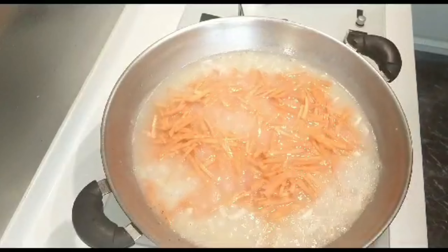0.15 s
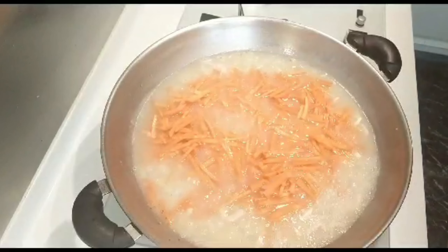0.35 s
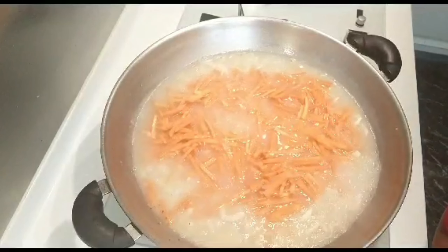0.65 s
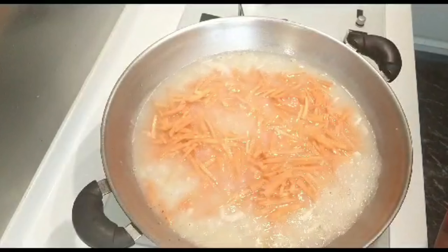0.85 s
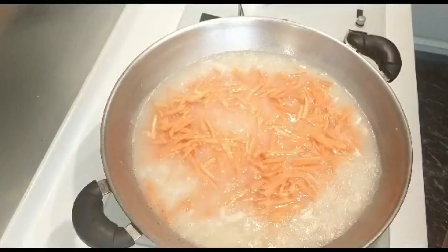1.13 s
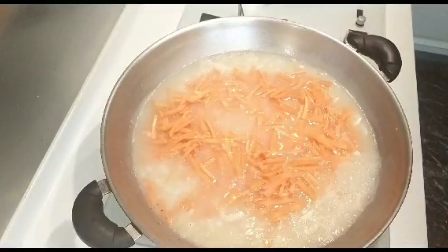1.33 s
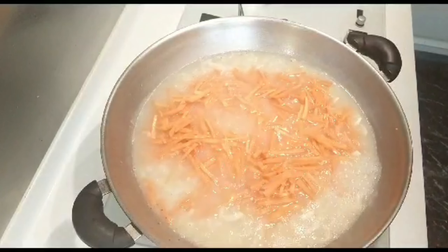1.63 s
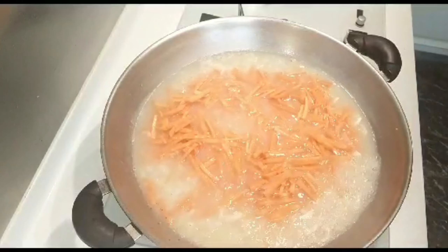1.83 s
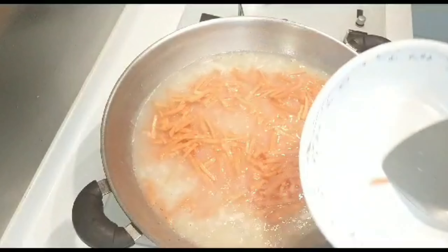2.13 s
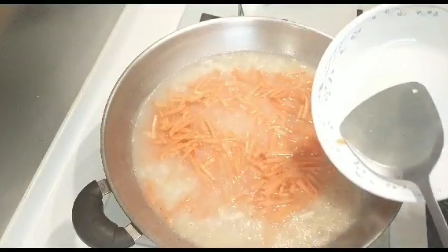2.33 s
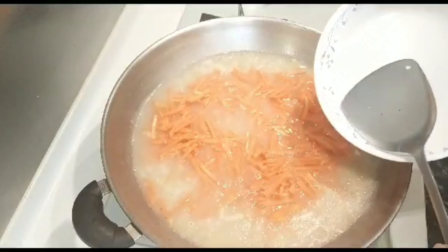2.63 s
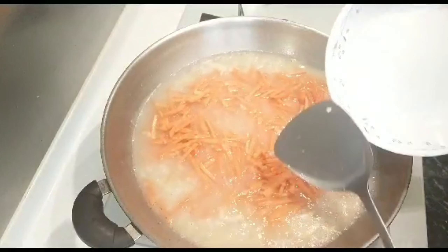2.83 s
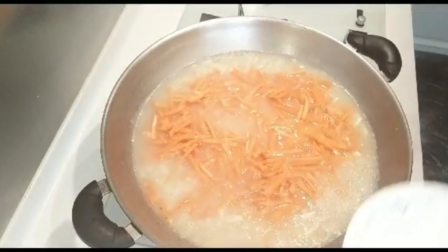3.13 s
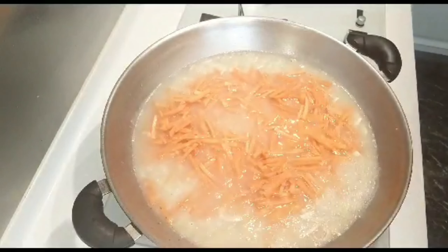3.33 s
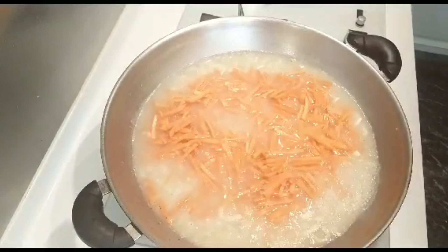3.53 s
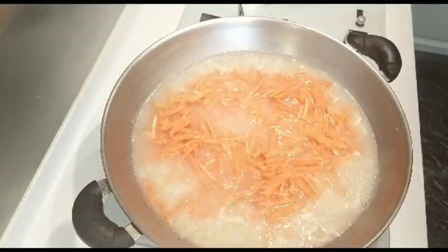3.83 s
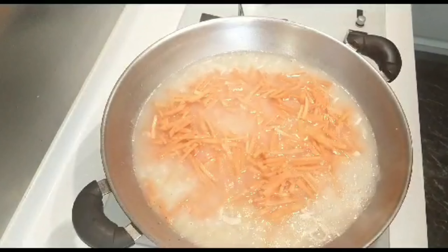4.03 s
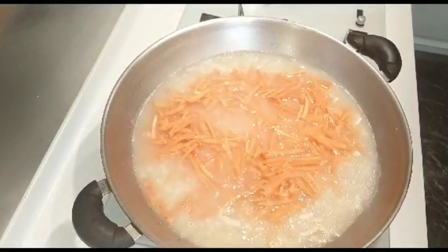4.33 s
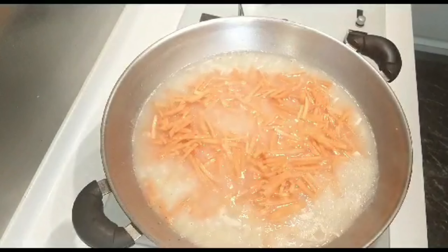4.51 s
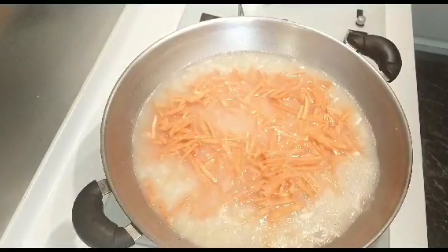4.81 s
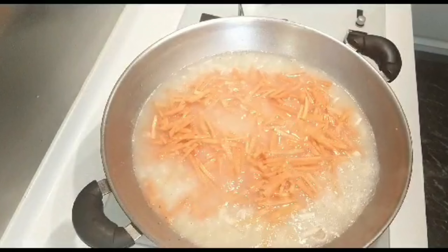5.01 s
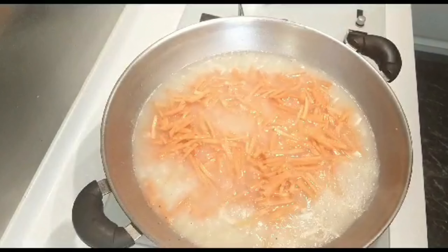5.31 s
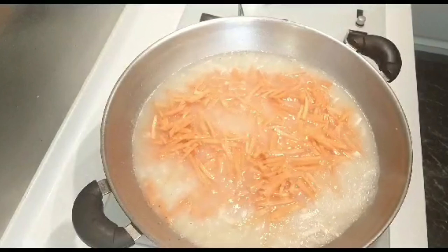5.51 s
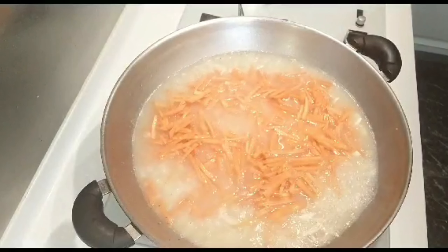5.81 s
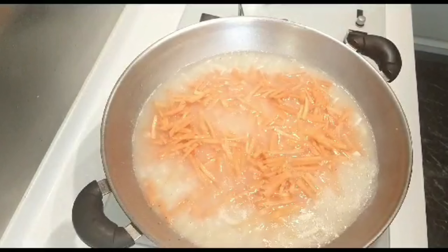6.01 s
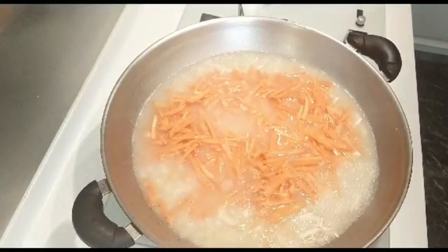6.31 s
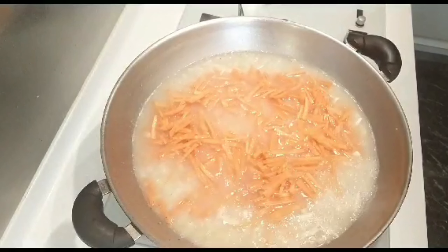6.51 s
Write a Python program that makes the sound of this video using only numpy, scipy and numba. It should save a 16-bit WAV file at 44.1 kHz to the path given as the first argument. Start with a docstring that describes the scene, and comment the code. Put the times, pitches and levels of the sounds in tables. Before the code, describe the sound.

A wide pan of broth boils with a low bubbling rumble and soft fizz while a metal utensil clinks, scrapes and is set down.

```python
"""Boiling broth and a metal utensil

Broth boils steadily in a wide steel pan in a small kitchen: swarms of dying sines make the rumble and the froth's fizz.
A utensil clinks, drags, taps, clinks again and is put down: ringing metal modes plus filtered clicks and knocks.
Two microphones a hand apart hear it with the room; their gain control ducks the boil after the loud clinks."""
import sys
import numpy as np
from scipy import signal
from scipy.fft import rfft, irfft, next_fast_len
from scipy.io import wavfile
from scipy.ndimage import uniform_filter1d
from numba import njit

SR = 44100
rng = np.random.default_rng(int(sys.argv[2]) if len(sys.argv) > 2 else 0)


def wav_out(sig):
    """Save sig, one row per channel (or a flat mono array), as 16-bit PCM at SR to the path in sys.argv[1]."""
    wavfile.write(sys.argv[1], SR, np.round(np.clip(np.atleast_2d(sig).T, -1, 1) * 32767).astype(np.int16))


N = 293706
TIME = np.arange(N) / SR
RING_TIME = TIME[:SR * 3 // 4]  # 0.75 s, for rings and room responses


def undb(db):
    """Decibels to gain."""
    return 10 ** (np.asarray(db) / 20)


def unit(x):
    """Scale to rms 1."""
    return x / np.sqrt(np.mean(x ** 2))


def burst(x):
    """Scale each channel to the energy of 20 ms at rms 1."""
    energy = np.sum(x ** 2, axis=-1, keepdims=True)
    return x / np.sqrt(energy / (SR / 50))


def add(out, s, sound):
    """Mix a sound in at a time in seconds."""
    start = int(s * SR)
    out[:, start:start + sound.shape[-1]] += sound[:, :N - start]


def shape(x, gain):
    """Filter by a gain that is a function of frequency."""
    size = next_fast_len(x.shape[-1] + 4096)
    hz = np.maximum(np.arange(size // 2 + 1) * SR / size, 1)
    return irfft(rfft(x, size) * gain(hz), size)[..., :x.shape[-1]]


def colour(points, hz):
    """Gain of a (Hz, dB) spectrum, interpolated over log frequency."""
    at, db = np.transpose(points)
    return undb(np.interp(np.log(hz), np.log(at), db))


def resonance_db(hz, centre_hz, width_hz, lift_db):
    """Bell-shaped lift, or dip, of one resonance."""
    return lift_db / (1 + (2 * (hz - centre_hz) / width_hz) ** 2)


def passband(x, lo_hz, hi_hz, order=1):
    """Causal band-pass."""
    edges = [lo_hz, min(hi_hz, SR / 2 - 100)]
    return signal.sosfilt(signal.butter(order, edges, "band", fs=SR, output="sos"), x)


MIC_GAP_M = 0.1


def diffuse(pair):
    """Sound from all sides at two spaced microphones: alike in the bass, unrelated in the treble."""
    def likeness(hz):
        return .995 * np.sinc(2 * hz * MIC_GAP_M / 343)  # 343 m/s, speed of sound
    mid = shape(pair[0] + pair[1], lambda hz: np.sqrt(1 + likeness(hz)))
    side = shape(pair[0] - pair[1], lambda hz: np.sqrt(1 - likeness(hz)))
    return np.array([mid + side, mid - side]) / 2


PAN_T60_S, NEAR_T60_S, ROOM_T60_S = 0.039, 0.15, 0.37
PAN_ECHO_DB, ROOM_DB = -2, -9.5  # against the near reflections


def kitchen():
    """Room response: first echoes inside the pan, a flurry from stove and worktop, then the duller walls."""
    first, near, far = (diffuse(rng.standard_normal((2, len(RING_TIME)))) for _ in range(3))
    fade_db = -60 * RING_TIME  # divided by a t60, falls 60 dB in that time
    first = burst(first * undb(fade_db / PAN_T60_S))
    near = burst(near * undb(fade_db / NEAR_T60_S))
    far = burst(passband(far, 60, 7600) * undb(fade_db / ROOM_T60_S))
    return undb(PAN_ECHO_DB) * first + near + undb(ROOM_DB) * far


def through(x, response):
    """Convolve with a stereo response."""
    x = np.atleast_2d(x)
    return signal.fftconvolve(x, response, axes=-1)[:, :x.shape[-1]]


@njit
def ring_bubbles(starts, hz, cycles, size, glide):
    """Each bubble is a dying sine whose pitch rises as it nears the surface."""
    out = np.zeros(N)
    for k in range(len(starts)):
        length = int(cycles[k] * SR / hz[k]) + 2
        pole = np.exp(2j * np.pi * hz[k] / SR - 5.8 / length)
        bend = np.exp(2j * np.pi * hz[k] / SR * glide / length)
        z = size[k] + 0j
        for i in range(starts[k], min(N, starts[k] + length)):
            z *= pole
            pole *= bend
            out[i] += z.imag
    return out


def swarm(rate, lo_hz, hi_hz, cycles, scatter_db, glide):
    """Bubbles of all sizes, most faint and a few strong, with even power per Hz."""
    when, pitch, life, strength = rng.random((int(rate * N / SR), 4)).T
    hz = lo_hz + (hi_hz - lo_hz) * pitch
    rarity = -np.log(1 - strength)
    strength_db = scatter_db * rarity / (1 + rarity / 10)  # the strongest are held back
    size = np.sqrt(hz) * undb(strength_db)  # higher bubbles are shorter, so start larger
    size = size * rng.choice([-1., 1.], len(hz))
    return ring_bubbles((when * N).astype(np.int64), hz, cycles * (.5 + life), size, glide)


# Spectrum of the big bubbles. Each row: frequency in Hz, relative level in dB per Hz.
BOIL_SPECTRUM = [(15, -61.5), (25, -31), (38, -26), (65, -12), (129, -2.5), (190, -9), (248, -8), (323, 0),
                 (366, -8), (429, -4.5), (559, -10), (768, -14), (1280, -18), (1400, -28.5), (1700, -34),
                 (2210, -56.5), (3740, -120)]
# Resonances of the filled pan on the stove. Each row: frequency in Hz, width in Hz, lift in dB.
PAN_RESONANCES = [(83.5, 42, 6), (103, 11, -7.5), (143.6, 38, 6), (252, 18, -2.5), (292, 12, 2),
                  (338.6, 11, 4.5), (379, 9.2, -9), (450.4, 27, 2), (570, 33, 6), (770, 32, -5.5),
                  (1159, 24, 5.5), (1327, 120, 7.5)]
BOIL_DB = -37


def boil():
    """Steam bubbles swell and collapse on the pan's floor, coloured by its resonances."""
    pair = np.array([swarm(rate=3200, lo_hz=30.4, hi_hz=1794, cycles=18.1, scatter_db=2.0, glide=0.16)
                     for _ in range(2)])

    def body(hz):
        lift_db = sum(resonance_db(hz, *row) for row in PAN_RESONANCES)
        return colour(BOIL_SPECTRUM, hz) * undb(lift_db)
    balance_db = np.array([[.35], [-.35]])  # left, right
    return unit(shape(diffuse(pair), body)) * undb(BOIL_DB + balance_db)


def surge(rate, depth_db):
    """Gain that wanders as patches of the surface well up and settle."""
    knots = np.arange(0, TIME[-1] + 1, 1 / rate)
    return undb(depth_db * np.interp(TIME, knots, rng.standard_normal(len(knots))))


# Spectrum of the froth. Each row: frequency in Hz, relative level in dB per Hz.
FROTH_SPECTRUM = [(880, -31), (1500, -1), (2300, -5.5), (3250, -6), (4370, -8), (4970, -9.5), (5330, -11),
                  (8240, -21.5), (9100, -17), (10600, -16.5), (14500, -34), (15400, -31.5), (16000, -48)]
FROTH_DB = -50.5  # before the surge


def froth(room, rim_hz=4270, rim_width_hz=150, rim_db=4):
    """Tiny bubbles burst at the surface and ring the pan's wall; the room blurs them into a fizz."""
    pair = np.array([swarm(rate=6000, lo_hz=1316, hi_hz=16000, cycles=11, scatter_db=0.5, glide=.07)
                     for _ in range(2)])
    wet = unit(through(pair[0], room)) + unit(through(pair[1], kitchen()))
    fizz = unit(wet) + undb(3.5) * unit(diffuse(pair))

    def body(hz):
        return colour(FROTH_SPECTRUM, hz) * undb(resonance_db(hz, rim_hz, rim_width_hz, rim_db))
    return unit(shape(fizz, body)) * undb(FROTH_DB) * surge(rate=14, depth_db=0.83)


MIC_LAG_S = .0001  # the utensil is a little nearer the right microphone


def with_direct(room, direct_db):
    """Put the straight path from the utensil to each microphone before the reflections."""
    straight = np.sinc((RING_TIME - np.array([[MIC_LAG_S], [0]])) * SR)
    return room + undb(direct_db) * burst(straight)


def mode(hz, t60, split=0.0041, twin_db=-2):
    """A mode of a round body: a close pair of partials that beat."""
    lower = np.cos(2 * np.pi * hz * (1 - split) * RING_TIME)
    upper = undb(twin_db) * np.cos(2 * np.pi * hz * (1 + split) * RING_TIME)
    onset = 1 - np.exp(-RING_TIME * hz)
    return (lower + upper) * np.exp(-np.log(1000) * RING_TIME / t60) * onset


# Modes of utensil and cookware in contact. Each row: frequency in Hz, t60 in seconds,
# then relative level in dB when met by the tip, by the edge, by the flat, and when dragged.
METAL_MODES = [(717, 0.4, -31, -10, -19, -34.5), (798, 0.12, -32, -6, -23, -35.5),
               (1170, 0.087, -33, -27, -16, -25.5), (1289, 0.16, 0, -16.5, -1.5, -20.5),
               (1258, 0.099, -10, -8, 6.5, -14), (1340, 0.16, -2.5, -9, -29, -11.5),
               (1910, 0.072, -22, -5, -3.5, -31), (2360, 0.13, -3.5, -3.5, -4.5, -3),
               (2380, 0.076, -12.5, -8.5, -8.5, -11), (2670, .09, -1.5, -3, -38, -22),
               (3180, 0.37, -15, -0.5, -47, -22), (3490, .06, -13, -17.5, -32, 1),
               (3950, .14, -16.5, -5.5, -9.5, -4), (4060, 0.13, -22, 2, -38, -14.5),
               (4980, 0.03, -6.5, -2.5, -21.5, -3), (5400, .14, -14.5, -2, -39, -13.5),
               (5550, 0.13, -2.5, -9, -28, -16.5), (5970, .1, -16.5, -12, -17.5, -12),
               (6160, .14, -22.5, -17.5, -16.5, -13.5), (6800, .14, -21.5, -5, -41.5, -18.5),
               (6800, 0.054, -5.5, -6.5, -42, -12), (6880, 0.35, -20, -4.5, -32, -13.5),
               (8380, 0.061, -11.5, -0.5, -23, -20), (9320, 0.1, -10.5, -9.5, -14.5, -6),
               (9530, .11, -13, 1.5, -28.5, -6), (9470, .12, -12.5, -5, -40, -5),
               (10090, 0.08, -7, 3, -31, -8), (10200, .08, -18.5, -14, -40.5, -4),
               (11210, .15, -12.5, -5, -18.5, -11), (12200, .08, -13, -7, -44, -9.5),
               (12800, .12, -15, -21.5, -25.5, -13), (12240, .08, -15, -3.5, -44.5, -11),
               (14320, .06, -39, -13, -40.5, -24), (15080, .1, -19.5, -32, -31, -16.5)]
PARTS = ("tip", "edge", "flat", "drag")
SPOT_DB = 2.44  # how much the mix of modes differs from spot to spot


def metal(room):
    """The ring of each mode, heard directly and in the room."""
    path = with_direct(room, direct_db=-2.0)
    return np.array([burst(through(mode(hz, t60), path)) for hz, t60, *_ in METAL_MODES])


def ring(modes, part, scatter_db):
    """Mix the modes for one contact; no two contacts fall on quite the same spot."""
    db = np.array(METAL_MODES)[:, 2 + PARTS.index(part)]
    db = db + scatter_db * rng.standard_normal(len(METAL_MODES))
    return burst(np.tensordot(undb(db), modes, 1))


def contact(knock_hz, knock_db, click_db, low_hz, top_hz, direct_db):
    """A click and a quickly damped knock; every spot has its own reflections."""
    room = with_direct(kitchen(), direct_db)
    narrow = passband(room, knock_hz / 1.054, knock_hz * 1.052)
    knock = burst(passband(narrow, knock_hz / 2, knock_hz * 2))
    click = burst(passband(room, low_hz, top_hz, order=2))
    return undb(knock_db) * knock + undb(click_db) * click


# Blows on the cookware. Each row: start in seconds, part that strikes, ring level in dB,
# seconds until it falls back.
BLOWS = [(2.1736, "tip", -18.5, .03), (2.7627, "edge", -13, .05), (3.7383, "flat", -5.2, 0.03)]
# Contact noise by striking part. Each entry: knock in Hz, knock level and click level in dB
# against the ring, lower and upper edge of the click in Hz.
CONTACT_NOISE = {"tip": (5197, -11, -10, 1800, 12499), "edge": (780, -12, -6, 450.5, 10000),
                 "flat": (1800, -15, -16, 220, 2000)}
# it rebounds and falls back more softly; each landing chatters once
CHATTER_S, CHATTER_DB, FALL_BACK_DB = .0145, -4.5, -12
REST_DAMP_DB_PER_S = 55  # extra damping once the utensil rests on the cookware


def clinks(modes):
    """Each blow lands, falls back and chatters; resting on the cookware then damps the ring."""
    out = np.zeros((2, N))
    for s, part, db, fall_s in BLOWS:
        for land_s, land_db in ((0, db), (fall_s, db + FALL_BACK_DB)):
            for late_s, loss_db in ((0, 0), (CHATTER_S, CHATTER_DB)):
                rested_s = np.maximum(land_s + late_s + RING_TIME - fall_s - CHATTER_S, 0)
                rings = ring(modes, part, SPOT_DB) * undb(-REST_DAMP_DB_PER_S * rested_s)
                noise = contact(*CONTACT_NOISE[part], direct_db=-11)
                add(out, s + land_s + late_s, undb(land_db + loss_db) * (rings + noise))
    return out


# the utensil slides: pressed harder up to the firmest moment, then eased until it lifts off
DRAG_START_S, DRAG_FIRM_S, DRAG_END_S = 2.2, 2.3, 2.43
SLIP_DB, PRESS_DB_PER_S, EASE_DB_PER_S = -38.5, 190, 64  # slip level at the firmest moment


def scrape(modes, room, slip_rate=150, grit_db=-3, uneven_db=5):
    """Metal sticks and slips on metal: uneven ticks, each on a new spot, that ring the modes."""
    out = np.zeros((2, N))
    grid = np.arange(DRAG_START_S, DRAG_END_S, 1 / slip_rate)
    grit = burst(passband(room, 2500, 13700))
    for when, late, force in zip(grid, rng.random(len(grid)), rng.standard_normal(len(grid))):
        slack_db = max(PRESS_DB_PER_S * (DRAG_FIRM_S - when), EASE_DB_PER_S * (when - DRAG_FIRM_S))
        slip = ring(modes, "drag", scatter_db=2.0) + undb(grit_db) * grit
        add(out, when + late / slip_rate, undb(SLIP_DB - slack_db + uneven_db * force) * slip)
    return out


# Catches during the slide and once more just after. Each row: start in seconds,
# level in dB that its tick, tone and ring are set against, pitch in Hz.
CATCHES = [(2.2602, -27, 9730), (2.293, -17, 3960), (2.3164, -20.5, 3980), (2.3438, -22.5, 3440),
           (2.3614, -22, 3470), (2.394, -20.5, 3470), (2.5433, -25, 5500)]


def catches(modes, room, tone_db=-15, tone_t60=.07, ring_db=-17):
    """The sliding utensil snags and jumps free: a tick, and one beating mode that sings out briefly."""
    out = np.zeros((2, N))
    for s, db, hz in CATCHES:
        tick = contact(knock_hz=hz, knock_db=-18, click_db=-20, low_hz=4000, top_hz=13000, direct_db=-19.5)
        tone = undb(tone_db) * burst(through(mode(hz, tone_t60), room))
        rings = undb(ring_db) * ring(modes, "drag", SPOT_DB)
        add(out, s, undb(db) * (tick + tone + rings))
    return out


# Light dull taps. Each row: start in seconds, level of the landing in dB.
TAPS = [(2.672, -27.3), (3.024, -33), (3.085, -43)]
# a tap lands, rocks on to a stiffer spot and bounces once; levels against the landing
TAP_HZ, ROCK_HZ, ROCK_S, ROCK_DB, BOUNCE_S, BOUNCE_DB = 1890, 3900, .0055, 3, 0.023, -6


def taps(modes, ring_db=-20):
    """Light, damped contacts that hardly ring: landing, rocking over, one bounce."""
    out = np.zeros((2, N))
    steps = ((0, TAP_HZ, 0), (ROCK_S, ROCK_HZ, ROCK_DB), (BOUNCE_S, TAP_HZ, BOUNCE_DB))
    for s, db in TAPS:
        for late_s, hz, step_db in steps:
            tap = contact(knock_hz=hz, knock_db=-0.5, click_db=-14, low_hz=1200, top_hz=4300, direct_db=-14.5)
            rings = undb(ring_db) * ring(modes, "drag", SPOT_DB)
            add(out, s + late_s, undb(db + step_db) * (tap + rings))
    return out


PUT_DOWN_S, PUT_DOWN_DB = 3.9472, -12


def put_down(modes, ring_db=-19):
    """The utensil is laid down: a hard knock together with the thud of the surface under it."""
    out = np.zeros((2, N))
    knock = contact(knock_hz=1445, knock_db=0, click_db=-9.5, low_hz=896, top_hz=12700, direct_db=-7.5)
    thud = contact(knock_hz=1870, knock_db=-6.5, click_db=-4.5, low_hz=200, top_hz=1400, direct_db=0.0)
    add(out, PUT_DOWN_S, knock + thud + undb(ring_db) * ring(modes, "edge", SPOT_DB))
    return undb(PUT_DOWN_DB) * out


def scene():
    """The steadily boiling pan and the utensil in one kitchen."""
    room = kitchen()
    modes = metal(room)
    broth = boil() + froth(room)
    strokes = clinks(modes) + scrape(modes, room) + catches(modes, room)
    return broth + strokes + taps(modes) + put_down(modes)


@njit
def ride(wanted_db, hold_s, attack_s, release_db_per_s):
    """Gain reduction: its target jumps to peaks, holds, then falls steadily; the cut glides after it."""
    out, target, cut, wait = np.empty(N), 0., 0., 0.
    for i in range(N):
        wait -= 1 / SR
        if wanted_db[i] >= target:
            target, wait = wanted_db[i], hold_s
        elif wait < 0:
            target -= release_db_per_s / SR
        cut += (target - cut) / (attack_s * SR)
        out[i] = cut
    return out


TOP_HZ = 15700  # upper limit of the sound


def record(dry, threshold_db=-20, slope=0.66):
    """Gain control turns down after loud sounds; peaks are rounded and the top is cut."""
    power = uniform_filter1d(np.mean(dry ** 2, axis=0), size=1024)
    over_db = np.maximum(10 * np.log10(np.abs(power) + 1e-12) - threshold_db, 0)
    cut_db = ride(slope * over_db, hold_s=0.95, attack_s=0.28, release_db_per_s=31.0)
    rounded = np.tanh(dry * undb(-cut_db))
    return signal.sosfilt(signal.ellip(8, .2, 70, TOP_HZ, fs=SR, output="sos"), rounded)


dry = scene()
out = record(dry)
wav_out(out)
```